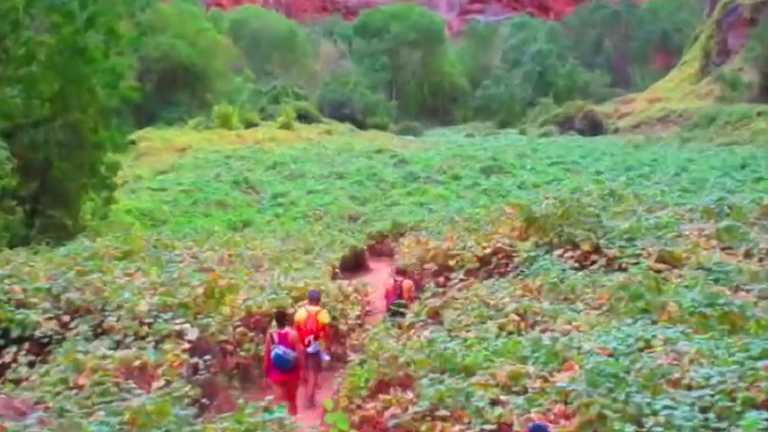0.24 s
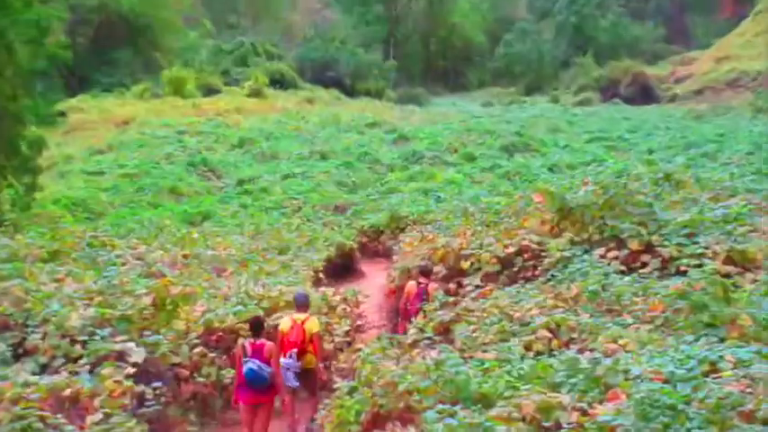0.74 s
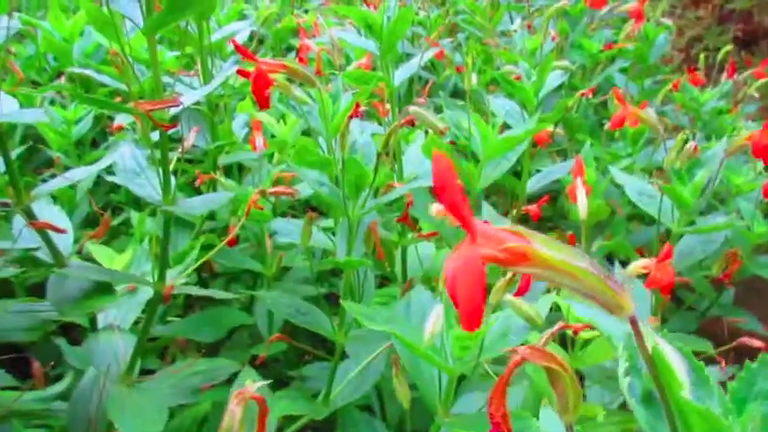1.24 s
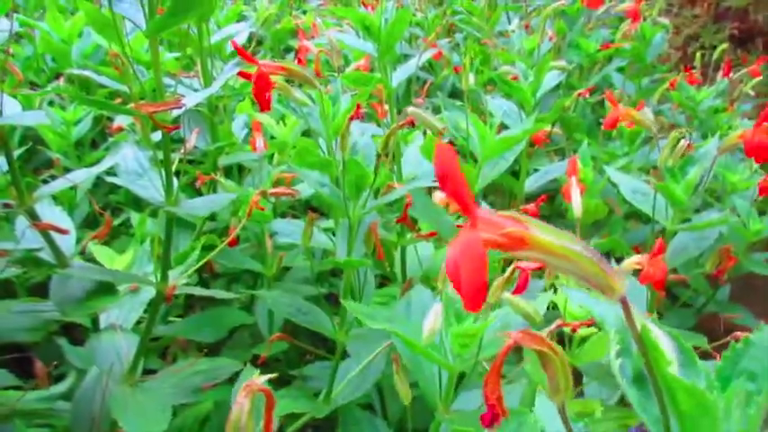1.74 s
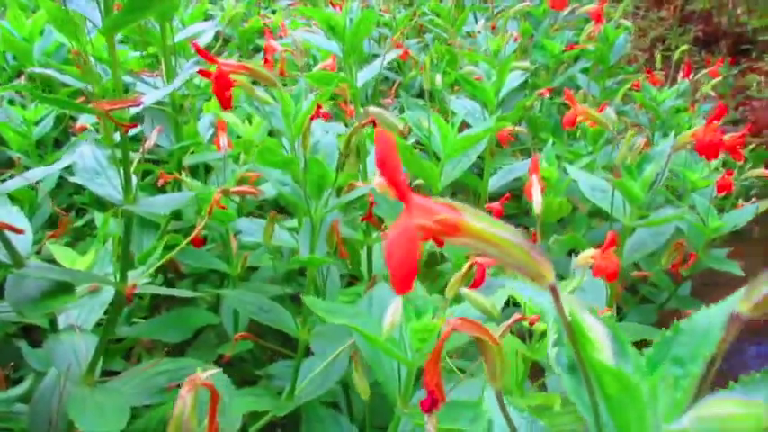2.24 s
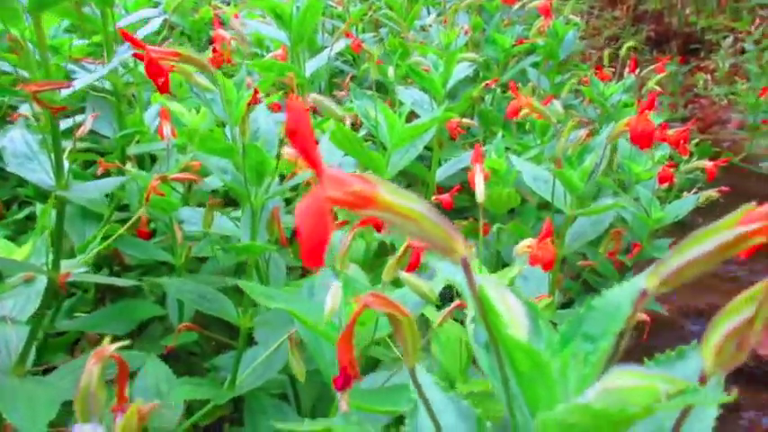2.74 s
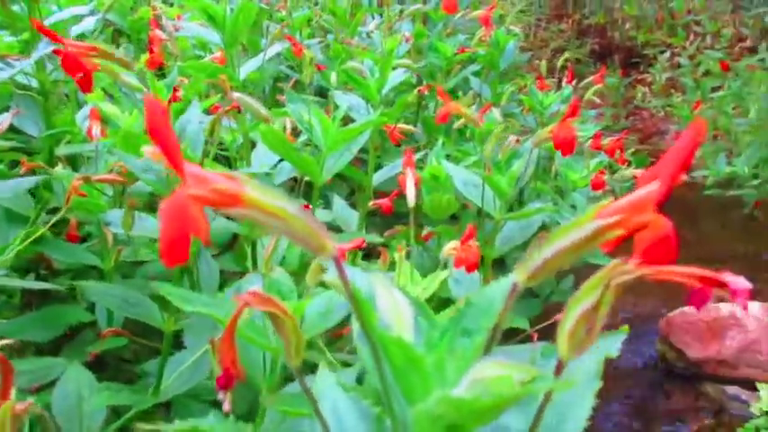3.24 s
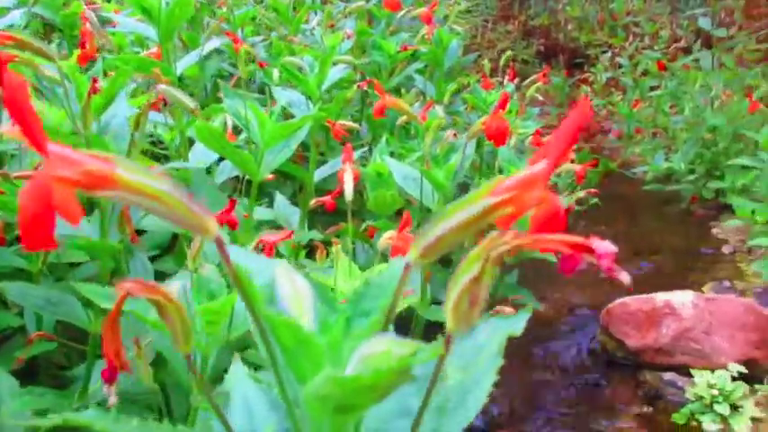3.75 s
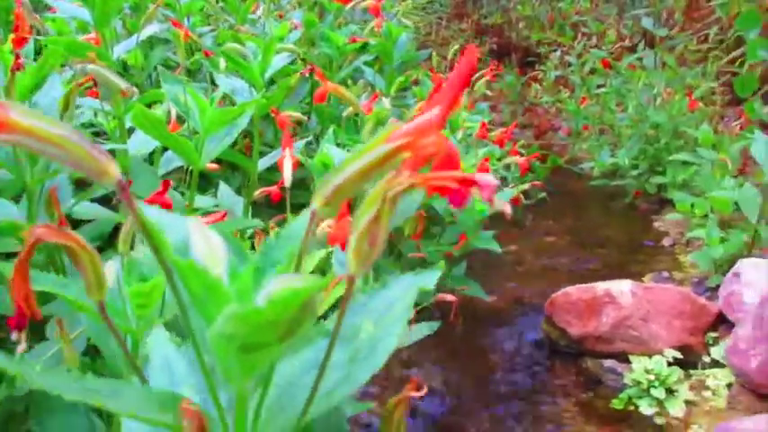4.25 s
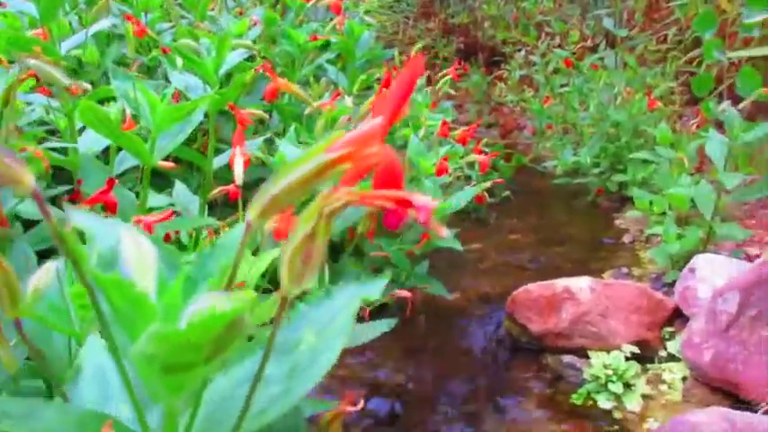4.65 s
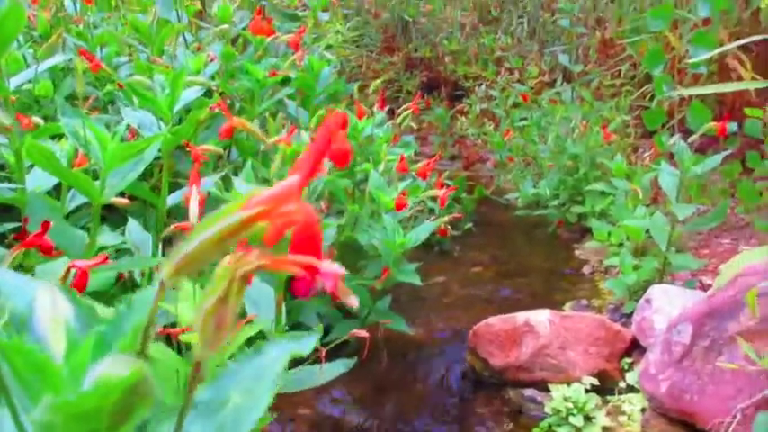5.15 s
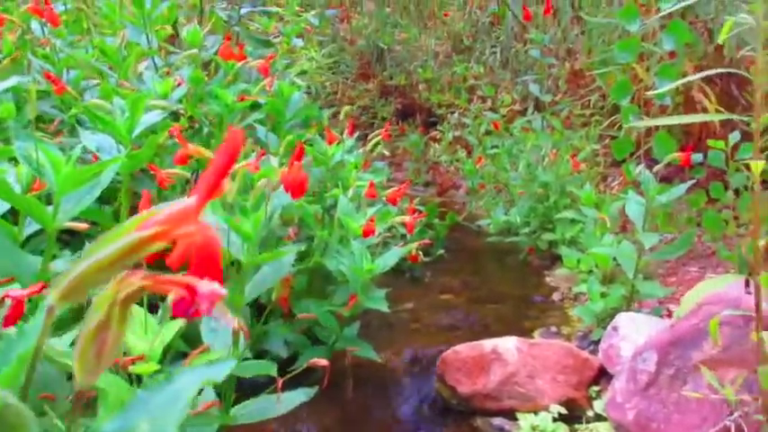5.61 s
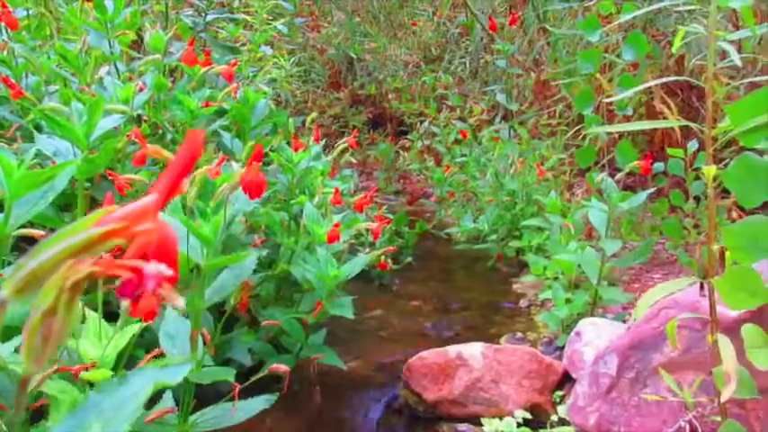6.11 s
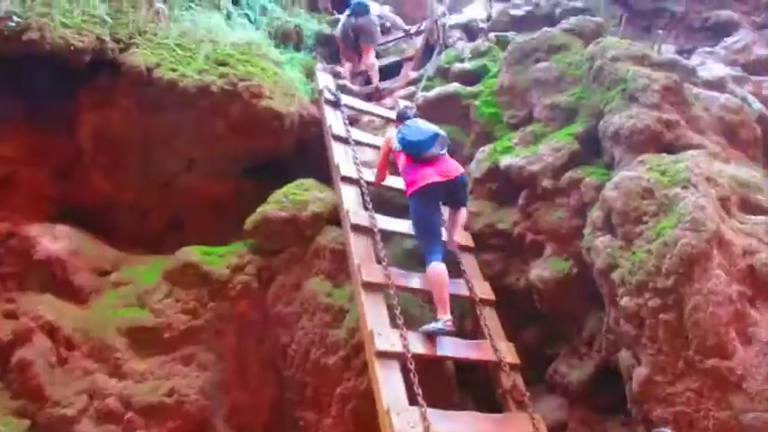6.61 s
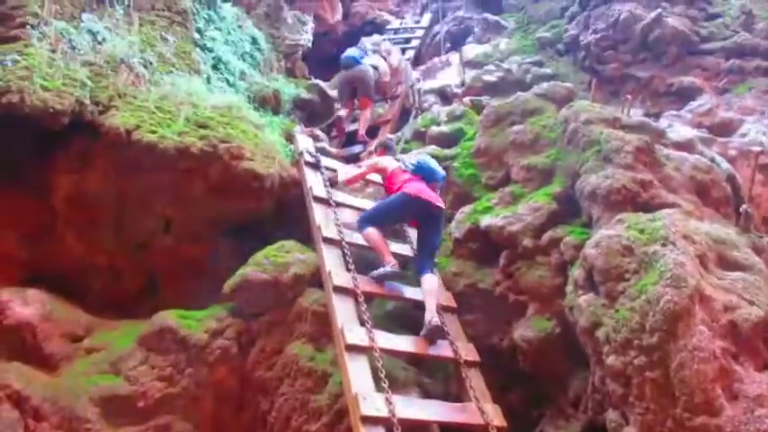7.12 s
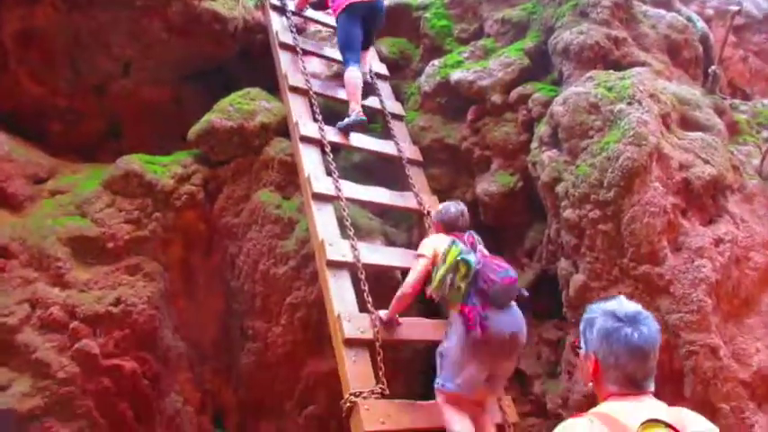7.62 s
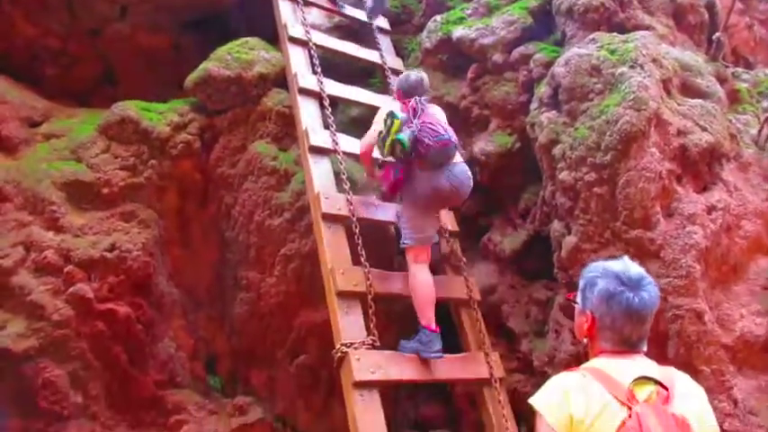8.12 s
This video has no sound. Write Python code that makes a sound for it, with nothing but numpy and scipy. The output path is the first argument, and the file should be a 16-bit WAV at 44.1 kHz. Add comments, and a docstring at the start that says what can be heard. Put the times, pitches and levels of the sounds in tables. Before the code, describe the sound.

In a canyon, distant falls make an even, dull roar for about a second and cut off. After a brief silence a brook babbles over stones close to the microphone, with glugs, gurgles, fine fizz and single plinks over a low churn. It stops abruptly, and a big waterfall behind rock walls swells up, rumbling and rushing. The first two sounds are mono; the last is wide stereo.

```python
"""A brook babbles over stones close by: folding wavelets trap bubbles that ring as glugs, gurgles,
fizz and plinks over a low churn and a soft wash. It is the second of three places in a canyon,
with abrupt silences between them. Before it comes the dull roar of distant falls, mono like the brook.
After it a big waterfall behind rock walls swells up out of the silence, wide and heavy."""
import sys
import numpy as np
from scipy import signal
from scipy.fft import rfft, irfft, next_fast_len
from scipy.io import wavfile
from scipy.ndimage import uniform_filter1d, map_coordinates

SR = 44100
rng = np.random.default_rng(int(sys.argv[2]) if len(sys.argv) > 2 else 0)


def to_wav(s):
    """Save 16-bit WAV."""
    ch = np.atleast_2d(s).T  # columns
    pcm = np.round(np.clip(ch, -1, 1) * 32767)  # PCM
    wavfile.write(sys.argv[1], SR, pcm.astype(np.int16))


N = 369103

FAR_SPAN_S, BROOK_SPAN_S, GORGE_START_S = (-.1, 1.119), (1.273, 6.395), 6.44
BABBLE_DB = -33.5  # the level that the brook's layers are balanced against

# How strongly bubbles of each size ring. Each row: pitch in Hz, relative level in dB.
BUBBLE_STRENGTH = [(300, -8.5), (600, -4), (1200, 2.5), (2000, 2.5), (2550, 3), (3200, -1.5), (4200, 0.5),
                   (6500, -3.5), (9500, -5), (14000, -13.5)]
# The bright hiss of spray. Each row: frequency in Hz, relative level in dB.
SPRAY_SPECTRUM = [(1500, -19), (4000, 4), (8000, 7), (11000, 0.5), (15000, -15)]


def brook():
    """Low churning and a soft wash carry glugs, gurgles, fine fizz and single plinks."""
    # The low body of the churning water. Each row: frequency in Hz, relative level in dB.
    churn_spectrum = [(15, -24), (28, -7.5), (45, -2), (85, -.5), (130, -1.5), (175, -2), (300, -9),
                      (600, -20.5), (2000, -97)]
    # The midrange wash of the current. Each row: frequency in Hz, relative level in dB.
    wash_spectrum = [(100, -23), (300, -1.5), (560, 0.2), (1100, -2.5), (2500, -8), (4000, -15.5),
                     (6300, -23), (9500, -29), (12000, -35.5), (15000, -39)]
    swell_db = babble_swell(np.arange(N) / SR)
    babble_gain = amp(BABBLE_DB + swell_db)
    churn_gain = amp(BABBLE_DB - 3.5 + 0.71 * swell_db + 0.46 * wobble(12))  # swells less
    fizz_gain = amp(BABBLE_DB + 1.55 * swell_db)  # swells more
    churn = churn_gain * turbulence(churn_spectrum, patchy_db=0.9)
    wash = amp(-2 + 0.32 * wobble(35)) * turbulence(wash_spectrum, patchy_db=2.0)
    glugs = amp(-10.5) * bubbles(wavelets(spread_db=0, count=400), low_hz=279, high_hz=1090,
                                 life_cycles=3.7, spread_db=2.0, burst_s=.012, count=700)
    gurgle = amp(-8.5) * bubbles(wavelets(spread_db=2.5, count=650), low_hz=886, high_hz=3486,
                                 life_cycles=4.9, spread_db=4.0, burst_s=.009, count=2400)
    fizz = amp(-15) * bubbles(wavelets(spread_db=4.5, count=600), low_hz=2745, high_hz=14100,
                              life_cycles=5.6, spread_db=3.9, burst_s=.0035, count=4600)
    patter = babble_gain * (glugs + gurgle) + fizz_gain * fizz + plinks() + spray(t60=.011, gain_db=1)
    return churn + babble_gain * wash + banks(patter, t60=0.024, tail_db=-8)


def babble_swell(time_s, depth_db=4.5, length_s=0.84):
    """The babble swells up to 0 dB as the brook comes in, then holds."""
    return -depth_db * np.clip(1 - (time_s - BROOK_SPAN_S[0]) / length_s, 0, 1)


def wavelets(spread_db, count):
    """Wavelets fold over the stones at random: times in seconds and sizes in dB, most of them small."""
    when, size = rng.random((count, 2)).T
    return np.interp(when, [0, 1], BROOK_SPAN_S), -spread_db * np.log(size + 0.056)


def bubbles(folds, low_hz, high_hz, life_cycles, spread_db, burst_s, count):
    """Each wavelet traps a cluster of bubbles; the smaller the bubble, the higher it rings."""
    fold_s, fold_db = (np.resize(column, count) for column in folds)
    when, pitch, faintness, sustain = rng.random((count, 4)).T
    start_s = fold_s - burst_s * np.log(1 - when)
    hz = low_hz * (high_hz / low_hz) ** pitch
    # most bubbles are faint, a few are strong
    db = along(BUBBLE_STRENGTH, hz) + .5 * fold_db - spread_db * np.log(faintness + 0.05)
    return unit(ringing(start_s, hz, db, life_cycles * 2 ** (2 * sustain - 1), rise=0.022))


def ringing(start_s, hz, db, life_cycles, rise, samples=1000):
    """Bubbles ring as damped sines whose pitch climbs as they near the surface."""
    cycles = hz[:, None] * np.arange(samples) / SR
    age = cycles / np.maximum(life_cycles, 1)[:, None]
    attack = 1 - np.exp(-cycles / .4)
    envelope = attack * np.exp(-age) * np.minimum(1, np.linspace(10, 0, samples))
    phase = 2 * np.pi * cycles * (1 + rise * np.minimum(age, 4))
    rings = amp(db)[:, None] * envelope * np.sin(phase)
    where = np.maximum(start_s * SR, 0).astype(int)[:, None] + np.arange(samples)
    return np.bincount(where.ravel(), rings.ravel(), N)[:N]


def plinks():
    """Single large bubbles ring out over the babble, each with a small splash."""
    # The bubbles that stand out. Each row: start in seconds, pitch in Hz, level in dB, life in cycles.
    accents = [(1.661, 2080, -23, 10), (2.081, 1100, -19.5, 4.6), (2.243, 2520, -17, 4),
               (2.423, 710, -15, 1.6), (2.664, 3100, -17, 3.7), (3.366, 3380, -18.5, 5.2),
               (3.367, 5620, -16.5, 2.2), (3.671, 1580, -11, 1.7), (3.76, 1680, -17, 4.2),
               (3.851, 2520, -16, 3.7), (4.101, 2650, -14.5, 4.8), (4.432, 2520, -15.5, 5.3),
               (4.584, 1840, -22.5, 12), (4.747, 2520, -16.5, 3.4), (4.848, 1630, -20, 6),
               (5.183, 1230, -20, 4), (5.238, 2310, -17.5, 7.3), (5.361, 3380, -14.5, 2.7),
               (5.634, 710, -14.5, 2.1), (5.937, 4320, -17.5, 3), (5.972, 1007, -20.5, 9.6),
               (6.104, 3660, -16.5, 5.1), (6.358, 3440, -21.5, 6.3)]
    start_s, hz, db, life_cycles = np.vstack([accents, stray_plinks(count=44)]).T
    return ringing(start_s, hz, db, life_cycles, rise=0.017) + amp(-21) * splashes(start_s, db, t60=.032)


def stray_plinks(count, typical_hz=2195, scatter_octaves=1.0, life_cycles=6.4, range_db=4.5):
    """Rows of lesser plinks at random times; the longer a bubble rings, the softer it starts."""
    when, strength, sustain = rng.random((count, 3)).T
    start_s = np.interp((np.arange(count) + when) / count, [0, 1], BROOK_SPAN_S)
    hz = np.clip(typical_hz * 2 ** (scatter_octaves * rng.standard_normal(count)), 300, 11000)
    stretch = 2 ** (2 * sustain - 1)
    over_babble_db = 7.5 + along(BUBBLE_STRENGTH, hz) + range_db * (strength - .5)
    db = BABBLE_DB + babble_swell(start_s) + over_babble_db - 10 * np.log10(stretch)
    return np.column_stack([start_s, hz, db, life_cycles * stretch])


def splashes(start_s, db, t60):
    """The water that traps a large bubble slaps down with a burst of hiss: sudden, then dying away."""
    # The tone of the slap. Each row: frequency in Hz, relative level in dB.
    splash_spectrum = [(300, -19), (900, 1.5), (2600, 1.5), (4500, -2), (7000, -12), (9500, -8),
                       (15000, -28.5)]
    slaps = np.bincount((start_s * SR).astype(int), amp(db) ** 2, N)[:N]
    power = signal.lfilter([1], [1, -amp(-60 / (t60 * SR)) ** 2], slaps)
    return np.sqrt(power) * turbulence(splash_spectrum, patchy_db=3.5)


def spray(t60, gain_db):
    """Small drops land with a sharp tick."""
    # The sharpest drops of spray. Each row: start in seconds, relative level in dB.
    drops = [(2.345, -32), (3.365, -31.5), (3.394, -32), (3.859, -30), (3.947, -28.5), (4.056, -36.5),
             (4.203, -31), (4.589, -28.5), (5.182, -28), (5.246, -31.5), (6.271, -33.5)]
    t, ticks = np.arange(N) / SR, np.zeros(N)
    for start_s, db in drops:
        ticks += (t >= start_s) * amp(db + gain_db - 60 * np.abs(t - start_s) / t60)
    return ticks * coloured(rng.standard_normal(N), SPRAY_SPECTRUM)


def banks(x, t60, tail_db):
    """Stones and leaves on the banks scatter a short tail behind the sound."""
    t = np.arange(SR // 8) / SR
    tail = rng.standard_normal(len(t)) * amp(-60 * t / t60) * (t > .001)
    return x + amp(tail_db) * signal.fftconvolve(x, tail / np.linalg.norm(tail))[:N]


def gorge_falls():
    """The plunge pool throbs under the rush of falling water, which returns from all the walls."""
    # The deep rumble of the pool. Each row: frequency in Hz, relative level in dB.
    plunge_spectrum = [(15, -28), (28, -0.5), (60, -7.5), (110, -0.5), (170, -2), (270, -6), (420, -20.5),
                       (1200, -62)]
    # The broad rush of the fall. Each row: frequency in Hz, relative level in dB.
    rush_spectrum = [(100, -39), (300, -1), (500, -2), (950, -4), (1750, -7.5), (3000, -12.5), (4500, -21),
                     (7300, -30.5), (11000, -33.5), (15500, -39)]
    plunge = amp(-37.5 + 0.26 * wobble(18)) * wide_turbulence(plunge_spectrum, patchy_db=0.5)
    rush = amp(-36.5 + 0.16 * wobble(8.1)) * wide_turbulence(rush_spectrum, patchy_db=1.2)
    # the rumble swells up a little sooner than the rush
    since_s = np.maximum(np.arange(N) / SR - GORGE_START_S, 0)
    return plunge * np.tanh(since_s / 0.7) ** 0.96 + rush * np.tanh(since_s / 0.78) ** 1.13


def wide_turbulence(spectrum, patchy_db):
    """Stereo water noise, nearly centred in the bass and wide in the treble; its mid has rms 1."""
    # The stereo image in the gorge. Each row: frequency in Hz, left-right correlation from -1 to 1.
    likeness = [(60, 0.8), (130, .65), (300, 0.36), (1400, 0.45), (3100, .36), (7000, -0.34), (15000, -.05)]
    angle = lambda hz: np.arccos(np.clip(along(likeness, hz), -1, 1)) / 2
    mid = filtered(turbulence(spectrum, patchy_db), lambda hz: np.cos(angle(hz)))
    side = filtered(turbulence(spectrum, patchy_db), lambda hz: np.sin(angle(hz)))
    return np.array([mid + side, mid - side]) / np.std(mid)


def far_falls():
    """Distance blurs the falls to an even, dull roar."""
    # The tone of the far roar. Each row: frequency in Hz, relative level in dB.
    roar_spectrum = [(15, -48), (25, -23.5), (43, -3), (75, -8.5), (109, 1.5), (154, -4.5), (181, -2),
                     (558, -1.5), (673, -3.5), (1150, -9.5), (1720, -16.5), (2240, -16.5), (5420, -34),
                     (9270, -38.5), (15000, -52.5)]
    return amp(-29 + .3 * wobble(9.5)) * turbulence(roar_spectrum, patchy_db=1.0)


def hiss_flick(at_s, width_s, db):
    """A faint, brief swish in the treble."""
    swell = np.exp(-.5 * ((np.arange(N) / SR - at_s) / width_s) ** 2)
    return amp(db) * swell * coloured(rng.standard_normal(N), SPRAY_SPECTRUM)


def turbulence(spectrum, patchy_db):
    """Water noise of rms 1 whose strength varies in patches of time and pitch."""
    bins = signal.stft(rng.standard_normal(N), nperseg=512)[2]
    patches = uniform_filter1d(rng.standard_normal(bins.shape), size=6, axis=0)  # smooth over pitch
    patches = uniform_filter1d(patches, size=8, axis=1)  # and over time
    noise = signal.istft(bins * amp(patchy_db * unit(patches)), nperseg=512)[1][:N]
    return coloured(noise, spectrum)


def coloured(x, spectrum):
    """Shape x with an EQ curve of (Hz, dB) points, at rms 1."""
    return unit(filtered(x, lambda hz: amp(along(spectrum, hz))))


def filtered(x, response):
    """Filter x by a gain given as a function of frequency."""
    size = next_fast_len(N + SR // 2)
    return irfft(rfft(x, size) * response(np.fft.rfftfreq(size, 1 / SR)), size)[..., :N]


def wobble(rate):
    """A smooth random curve with rate knots a second."""
    return map_coordinates(rng.standard_normal(int(N * rate / SR) + 4), [np.arange(N) * rate / SR])


def gate(span_s, fade_s):
    """Open hard at the start of the span and fade shut at its end."""
    t = np.arange(N) / SR
    return (t >= span_s[0]) * np.clip((span_s[1] - t) / fade_s, 0, 1)


def along(points, hz):
    """Read (Hz, value) points on a log frequency axis."""
    knots_hz, values = np.transpose(points)
    return np.interp(np.log(hz + 1), np.log(knots_hz + 1), values)


def amp(db):
    """Decibels to gain."""
    return 10 ** (np.asarray(db) / 20)


def unit(x):
    """Scale to rms 1."""
    return x / np.sqrt(np.mean(x ** 2) + 1e-20)


def scene():
    """Far falls, brook and gorge in turn; the first two are mono and stop a little lower in the treble."""
    far = (far_falls() + hiss_flick(at_s=.405, width_s=.012, db=-49)) * gate(FAR_SPAN_S, fade_s=0.016)
    near = brook() * gate(BROOK_SPAN_S, fade_s=0.0045)
    return filtered(far + near, lambda hz: hz < 15100) + gorge_falls()


def record(dry):
    """A steep low-pass takes the highest treble off the whole mix."""
    return filtered(dry, lambda hz: hz < 15750)


dry = scene()
out = record(dry)
to_wav(out)
```